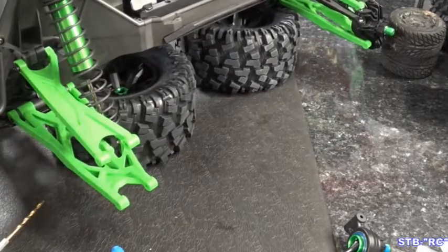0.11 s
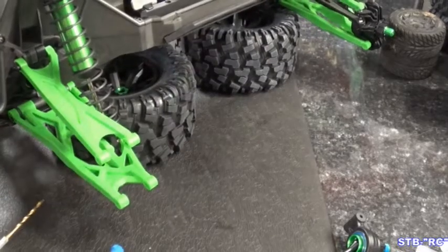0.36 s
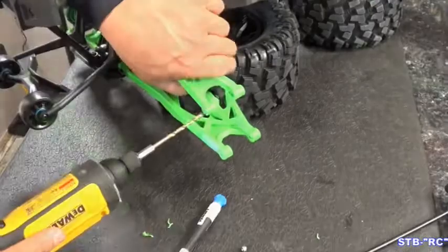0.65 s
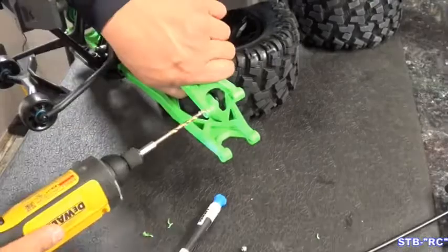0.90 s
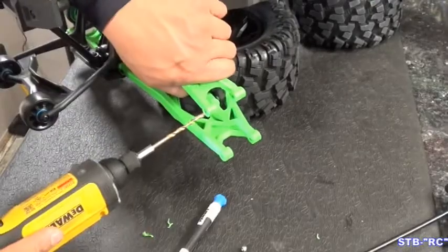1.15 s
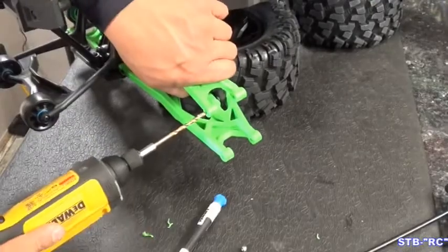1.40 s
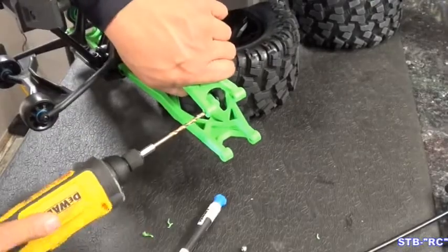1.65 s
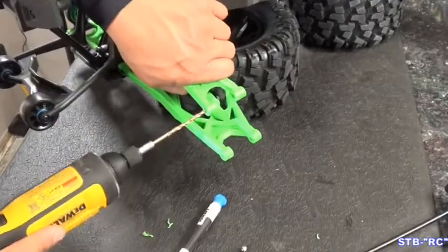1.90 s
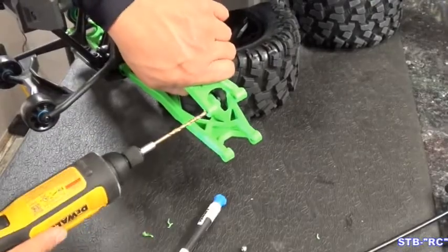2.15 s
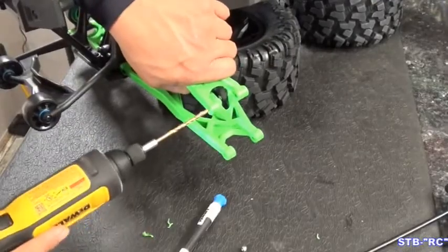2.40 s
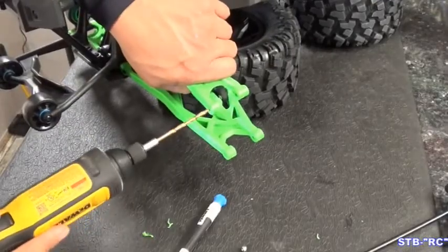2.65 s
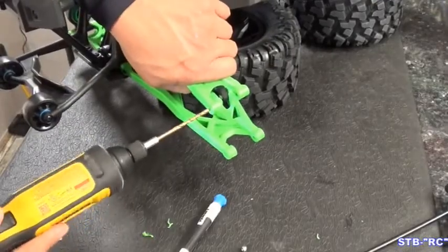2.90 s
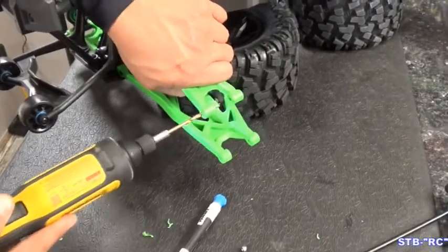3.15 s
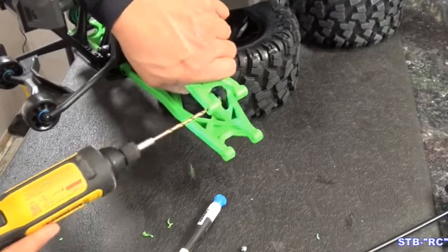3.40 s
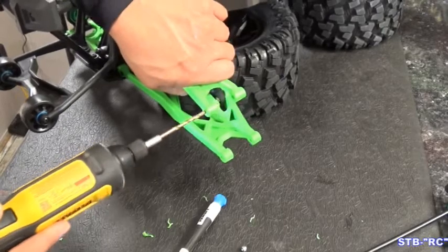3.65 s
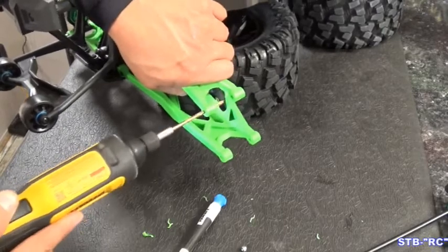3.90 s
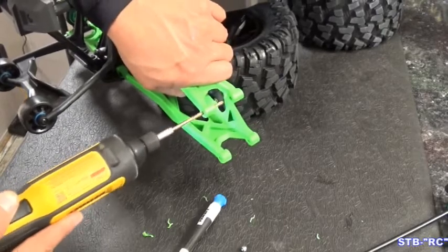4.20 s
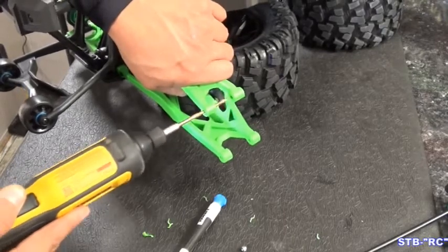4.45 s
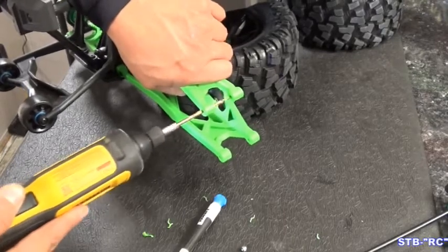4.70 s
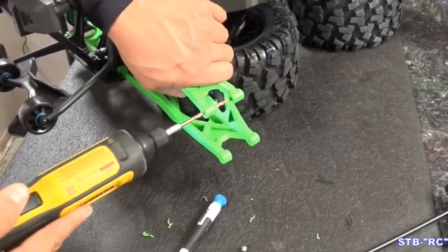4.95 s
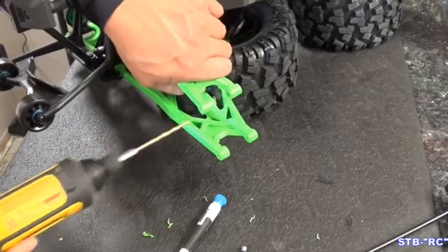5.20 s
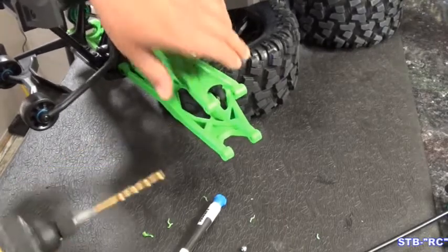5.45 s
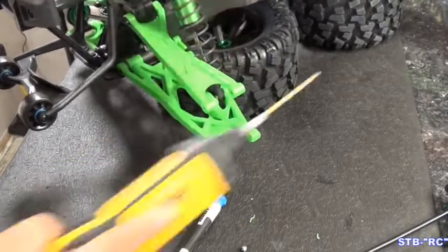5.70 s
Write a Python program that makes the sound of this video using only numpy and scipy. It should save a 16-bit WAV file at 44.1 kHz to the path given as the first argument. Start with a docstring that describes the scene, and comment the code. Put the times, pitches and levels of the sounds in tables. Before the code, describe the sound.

After a bench knock and a few faint plastic ticks, a small cordless screwdriver whirs steadily, its bit scraping briefly through plastic, then brakes to a stop.

```python
"""Small cordless screwdriver in a workshop

A knock on the bench and a few plastic ticks come first, over a rustle that dies away.
Then the motor runs up as tones that follow its speed, and gear tooth contacts ring the housing.
Bright noise grains are the bit scraping through plastic; at the end the motor brakes.
A quiet workshop echoes softly, with room tone behind; one nearly mono microphone hears it all.
"""
import sys
import numpy as np
from scipy import signal
from scipy.fft import rfft, irfft
from scipy.io import wavfile

SR = 44100
rng = np.random.default_rng(int(sys.argv[2]) if len(sys.argv) > 2 else 0)


def inscribe(sig):
    """Save sig as 16-bit PCM at rate SR to the path in sys.argv[1].

    A 1-D sig is mono; a 2-D sig holds one channel per row.
    Samples are clipped to [-1, 1] before scaling.
    """
    pcm = np.round(np.clip(np.atleast_2d(sig).T, -1, 1) * 32767)
    wavfile.write(sys.argv[1], SR, pcm.astype(np.int16))


def ratio(d):
    """dB to gain"""
    e = np.asarray(d, float) / 20
    return 10 ** e


N = 256896   # length in samples

# All source levels hold ahead of the microphone gain; spectrum levels are relative, per Hz of bandwidth.

# Rotor speed: a run-up, then a braked run-down
FREE_TURNS_PER_S, SPIN_FROM_S, SPIN_UP_S = 399.6, 1.605, 0.155
BRAKE_S, BRAKE_DECAY_S = 5.132, 0.11
MOTOR_ON_S, MOTOR_OFF_S = 1.72, 5.25   # the motor is heard between these moments
# The bit binds and slows the rotor: t/s, speed lost/(turns per s)
SPEED_SAG = [(2.8, 0), (2.9, 5.5), (3.0, 17.5), (3.17, 21.5), (3.22, 9.5), (3.33, 0)]
# Pole-passing whine, which comes and goes: t/s, mean level/dB
POLE_WHINE = [(1.72, -63), (1.76, -52), (1.78, -48), (1.83, -64), (1.88, -48.5), (1.94, -58), (2.07, -51.5),
              (2.79, -49), (2.86, -60), (3.2, -59), (3.225, -47.5), (3.26, -70), (3.35, -51), (3.42, -45.5),
              (3.5, -52), (3.6, -81), (4.1, -57), (4.25, -59), (4.36, -51), (4.75, -59), (5.12, -54),
              (5.25, -72)]
# Higher multiples of the rotor rate: multiple, mean level at free speed/dB
HIGHER_ORDERS = [(2, -75), (5, -57.5), (9, -57.5)]
# Rotor imbalance: level at free speed as the motor comes on; grows as speed to this power
IMBALANCE_DB, IMBALANCE_POWER, IMBALANCE_WAVER_DB = -61, 3, 2
IMBALANCE_FADE_DB_PER_S = 1.7   # the bit sinks in and steadies the tool
# The case shaken as the speed sweeps: f/Hz, width/Hz, level before the brake/dB
CASE_SHAKES = [(640, 98, -64), (845, 110, -53), (940, 51, -59)]

# Gear rattle over time: t/s, housing level/dB, treble against housing/dB
GEAR_LEVELS = [(1.69, -60.5, 0), (1.77, -40.5, -10), (1.85, -41, -1.5), (1.94, -41.5, 0.5),
               (2.39, -39.5, -2), (2.86, -39.5, 0.5), (3.03, -39, -1.5), (3.12, -39, -6), (3.3, -39.5, 0),
               (3.54, -39.5, -1.5), (5.1, -39.5, -2), (5.15, -38, 0), (5.19, -41.5, -0.5),
               (5.22, -48, -3.5), (5.34, -60.5, -7), (5.37, -61, -11), (5.45, -76, -3)]
# Colour of the gear housing: f/Hz, level/dB
HOUSING_COLOUR = [(90, -75), (200, -33), (650, -26), (1100, -13), (1500, -11.5), (2000, -7), (2400, -7),
                  (2700, -2.5), (3650, -1), (4200, -4.5), (5200, -9), (6300, -8), (7200, -1.5), (8300, -9),
                  (9800, -23), (11500, -21.5), (12600, -29.5), (14000, -29), (16000, -36)]
# Resonances of the housing, against each other: f/Hz, width/Hz, mean level/dB
HOUSING_MODES = [(2000, 10, -14), (2680, 16, -15), (3040, 100, -13), (3150, 95, 9), (3370, 40, 10.5),
                 (3600, 29, 5.5), (3680, 95, 2.5), (3970, 25, 3), (4220, 15, -14), (5800, 98, -23),
                 (7100, 18, -8)]
# Bright ring of the gear case: f/Hz, width/Hz
CASE_RING = [(6950, 56), (7110, 21), (7240, 12)]
BRIGHT_DB, BRIGHT_WAVER_DB = -16.5, 3.0   # against the housing, outside the swell
# The bright ring sings out once the bit is through
BRIGHT_SWELL_S, BRIGHT_SWELL_DB, BRIGHT_RISE_S, BRIGHT_FALL_S = 3.31, 17.5, 0.069, 0.082

# The bit bites: t of the peak/s, peak level/dB, hold/s
BIT_BITES = [(2.92, -33, 0.067), (3.075, -32.5, .11)]
BITE_RISE_DB_PER_S, BITE_FALL_DB_PER_S = 220, 420
# Colour of the scraped plastic: f/Hz, level/dB
SHAVING_COLOUR = [(350, -42), (600, -25), (1050, -11.5), (1130, -12), (1260, -20.5), (3390, -3),
                  (5120, -4.5), (7410, -5), (13900, -30), (16000, -33)]

# Knocks on the bench: t/s, level/dB, top of the contact's band (lower is softer) f/Hz
BENCH_KNOCKS = [(.303, -23, 3040), (.3089, -24.5, 1490)]
# Modes of the bench top, against each other: f/Hz, level/dB, time to fall 60 dB t/s
BENCH_MODES = [(260, -23, 0.1), (344, -4.5, 0.098), (494, -7, 0.12), (686, -7, 0.2), (851, 5, 0.1),
               (837, -6, .08), (1420, -16, 0.044), (1690, -9, 0.033), (2120, -12, 0.032), (3100, -15, .03)]
# Colour of the noisy tail of a knock: f/Hz, level/dB
KNOCK_TAIL_COLOUR = [(100, -27), (200, -2), (350, -3.5), (510, -0.5), (800, -4), (1100, -16), (1600, -17.5),
                     (2200, -29), (3500, -37), (5000, -60)]
KNOCK_TAIL_T60_S = 0.32
# Jolts of the bench frame: t/s, level/dB
FRAME_JOLTS = [(0.302, -49.5), (3.226, -47.5)]
BOOM_HZ, BOOM_T60_S = 81.7, 0.78

# Plastic ticks and bumps: t/s, tail level/dB, centre f/Hz, width/octaves, time to fall 60 dB t/s
PLASTIC_TICKS = [(0.689, -58, 3000, 2.2, 0.073), (.735, -64, 6000, 0.47, .2), (0.8125, -45, 2370, 1, 0.16),
                 (.812, -52.5, 6500, .66, .04), (0.981, -57, 2000, 0.64, .12),
                 (1.426, -55, 5400, 0.59, 0.16), (1.47, -54, 4000, 1.5, 0.12),
                 (1.601, -50.5, 4730, 0.94, 0.1), (1.655, -45.5, 4200, 1.4, 0.11),
                 (1.658, -41.5, 790, 1.9, 0.1), (1.719, -51, 3460, 2.1, 0.1),
                 (3.191, -41.5, 447, 1.4, 0.098), (3.25, -47, 547, 1, 0.22), (3.192, -36, 1300, .45, 0.054),
                 (3.225, -46, 61.7, 0.85, 0.24), (3.8422, -29.5, 4060, 1.25, 0.1),
                 (5.15, -31.5, 3100, 0.45, 0.034), (5.181, -33, 3100, .7, 0.043),
                 (5.1967, -35, 3180, 0.81, 0.034), (5.2964, -47.5, 5000, 0.71, 0.07),
                 (5.357, -51.5, 2000, 1.7, 0.17), (5.38, -52.5, 4480, 1.1, 0.092),
                 (5.36, -52.5, 1090, 1, 0.37), (5.44, -53.5, 494, 0.49, 0.091),
                 (5.5, -53, 398, 0.89, 0.076), (5.607, -50, 400, 1.4, 0.045)]

# Colour of the rustle at the start: f/Hz, level/dB
RUSTLE_SPECTRUM = [(59, -45), (100, -16), (491, -5), (933, -24), (1030, -21), (1200, -21), (1630, -11.5),
                   (2370, -18), (6790, -13.5), (14000, -41)]
RUSTLE_START_DB, RUSTLE_T60_S = -39, 0.42

# Echo of the workshop
SHOP_T60_S, WALL_CUT_HZ, SHOP_DB = 0.4, 4000, -16.5

# Colour of the room tone: f/Hz, level/dB
ROOM_TONE_COLOUR = [(15, -34), (25, -6), (175, -3.5), (212, -5), (242, 0.5), (354, -1.5), (394, -5.5),
                    (476, -2), (863, -4.5), (1070, -5), (1330, -8), (3080, -12.5), (16000, -19)]
ROOM_TONE_DB = -56

# Colour of the microphone's own hiss: f/Hz, level/dB
HISS_COLOUR = [(25, -2), (300, -2), (800, -10.5), (2000, -15.5), (4000, -9), (7000, -9), (11000, -8),
               (16000, -6.5)]
HISS_DB, MIC_GAIN_DB = -64.5, 3.0
# The level dips briefly: t/s, depth/dB, half width/s
LEVEL_DIPS = [(.1, 1.5, 0.14), (.53, 3, 0.094)]


def seconds():
    """Time of every sample."""
    return np.arange(N) / SR


def rms_one(x):
    """Scale to an rms (average strength) of 1."""
    return x / np.sqrt(np.mean(x ** 2) + 1e-20)


def in_time(rows):
    """Columns of a table over time, joined by straight lines, at every sample."""
    s, *columns = np.transpose(rows)
    return [np.interp(seconds(), s, column) for column in columns]


def while_on(start_s, end_s):
    """1 between two moments, with 10 ms fades."""
    from_start = seconds() - start_s + 0.01
    to_end = end_s - seconds()
    return np.clip(np.minimum(from_start, to_end) / 0.01, 0, 1)


def coloured(x, spectrum):
    """Give a steady excitation a spectrum; rms 1."""
    hz, db = np.transpose(spectrum)
    bins_hz = np.maximum(np.arange(N // 2 + 1) * SR / N, 1)
    filter_db = np.interp(np.log(bins_hz), np.log(hz), db)
    return rms_one(irfft(rfft(x) * ratio(filter_db), N))


def drift(rate_hz):
    """Slow chance wander of spread 1, made at every 40th sample and joined up."""
    r = np.exp(-80 * np.pi * rate_hz / SR)
    noise = rng.standard_normal(N // 40 + 2002)
    slow = signal.lfilter([1], [1, -2 * r, r * r], noise)[2000:]   # skip the filter's start
    return np.interp(np.arange(N) / 40, np.arange(len(slow)), rms_one(slow - slow.mean()))


def ring(clicks, hz, t60):
    """A unit click sets a sine of height 1 ringing; it falls 60 dB in t60 seconds."""
    r, w = ratio(-60 / (t60 * SR)), 2 * np.pi * hz / SR
    return signal.lfilter([0, np.sin(w)], [1, -2 * r * np.cos(w), r * r], clicks + 1e-18)


def t60_of(width_hz):
    """A narrow resonance rings long, a wide one dies soon."""
    return np.log(1000) / (np.pi * width_hz)


def ring_out(level, t60):
    """An envelope that cannot fall faster than a ring dies."""
    fall_db = 60 * seconds() / t60
    level_db = 20 * np.log10(level + 1e-9)
    return ratio(np.maximum.accumulate(level_db + fall_db) - fall_db)


def speed():
    """Rotor turns per second: a smooth run-up, a sag under load, a braked run-down."""
    t = seconds()
    run_up = 1 - np.exp(-(np.maximum(t - SPIN_FROM_S, 0) / SPIN_UP_S) ** 2)
    run_down = np.exp(-np.maximum(t - BRAKE_S, 0) / BRAKE_DECAY_S)
    return (FREE_TURNS_PER_S * run_up - in_time(SPEED_SAG)[0]) * run_down


def motor():
    """Tones at the rotor rate and its multiples; the three poles whine at the third."""
    t, turns, on = seconds(), speed(), while_on(MOTOR_ON_S, MOTOR_OFF_S)
    share = turns / FREE_TURNS_PER_S
    angle = 2 * np.pi * np.cumsum(turns * (1 + 0.001 * drift(15))) / SR
    whine_db = in_time(POLE_WHINE)[0] + drift(10)
    tones = ratio(whine_db) * np.sin(3 * angle)
    imbalance_db = IMBALANCE_DB - IMBALANCE_FADE_DB_PER_S * (t - MOTOR_ON_S)
    imbalance_db += IMBALANCE_WAVER_DB * drift(5.5)
    tones += ratio(imbalance_db) * share ** IMBALANCE_POWER * np.sin(angle)
    for multiple, level_db in HIGHER_ORDERS:
        tone = np.sin(multiple * angle + rng.uniform(0, 2 * np.pi))
        tones += ratio(level_db + 1.65 * drift(24)) * share ** 4 * tone
    out = np.sqrt(2) * tones * on   # a sine of rms 1 is sqrt(2) high
    braking_db = 9.4 * (t > BRAKE_S)   # the brake shakes harder than the run-up
    for hz, width, level_db in CASE_SHAKES:   # the case shudders while the pole rate sweeps through a mode
        shake = rms_one(ring(rng.standard_normal(N), hz, t60_of(width)))
        closeness = np.exp(-((3 * turns - hz) / 110) ** 2)
        out += ratio(level_db) * ring_out(ratio(braking_db) * closeness * on, 0.36) * shake
    return out


def gears():
    """Thousands of uneven tooth contacts a second ring the housing; the level wavers a little by chance."""
    housing_db, treble_db = in_time(GEAR_LEVELS)
    sizes = ratio(0.83 * np.minimum(rng.exponential(1, N), 5)) * rng.standard_normal(N)
    teeth = sizes * (rng.random(N) < 24000 / SR)   # about 24000 contacts a second
    rings = np.zeros(N)
    for hz, width, level_db in HOUSING_MODES:   # each ring swells and fades a little by chance
        rings += ratio(level_db + drift(5)) * rms_one(ring(teeth, hz, t60_of(width)))
    rattle = coloured(teeth, HOUSING_COLOUR) + ratio(-10.5) * rms_one(rings)

    # split at 4900 Hz so that the two parts waver separately
    low = signal.sosfiltfilt(signal.butter(2, 4900, fs=SR, output="sos"), rattle)
    high = rattle - low
    low = rms_one(low * ratio(0.5 * drift(4.9)))
    high = rms_one(high * ratio(0.5 * drift(3.3)))

    since = seconds() - BRIGHT_SWELL_S
    swell_s = np.where(since < 0, BRIGHT_RISE_S, BRIGHT_FALL_S)
    swell_db = BRIGHT_SWELL_DB * np.exp(-(since / swell_s) ** 2)
    bright_db = BRIGHT_DB + BRIGHT_WAVER_DB * drift(4) + swell_db
    bright = rms_one(sum(ring(teeth, hz, t60_of(width)) for hz, width in CASE_RING))

    mix = low + ratio(treble_db) * high + ratio(bright_db) * bright
    on = while_on(GEAR_LEVELS[0][0], GEAR_LEVELS[-1][0])
    return ratio(housing_db + 0.37 * drift(16)) * mix * on


def cutting():
    """The edge tears chips off the plastic: dense bright grains; each bite swells, holds and drops."""
    t = seconds()
    grains = rng.standard_normal(N) * ratio(1.3 * np.minimum(rng.exponential(1, N), 5))
    grains *= ratio(1.4 * drift(40))
    level = np.zeros(N)
    for s, peak_db, hold_s in BIT_BITES:
        rise_db = BITE_RISE_DB_PER_S * np.maximum(s - t, 0)
        fall_db = BITE_FALL_DB_PER_S * np.maximum(t - s - hold_s, 0)
        level += ratio(peak_db - rise_db - fall_db)
    return level * coloured(grains, SHAVING_COLOUR)


def bench():
    """Each knock is a short rough contact into the modes of the bench top; a noisy tail dies away."""
    out, t = np.zeros(N), np.arange(SR) / SR
    noise = rng.standard_normal((len(BENCH_KNOCKS), 2, SR))
    for (s, level_db, soft_hz), (rough, tail_noise) in zip(BENCH_KNOCKS, noise):
        contact = (t < 1 / SR) + 0.053 * rough * ratio(-60 * t / 0.054)   # a click and fading roughness
        band = signal.butter(2, [200, soft_hz], "band", fs=SR, output="sos")
        push = signal.sosfilt(band, contact)
        rung = sum(ratio(db - 7) * ring(push, hz, t60) for hz, db, t60 in BENCH_MODES)
        tail = coloured(np.resize(tail_noise, N), KNOCK_TAIL_COLOUR)[:SR]
        tail *= ratio(-6.5 - 60 * t / KNOCK_TAIL_T60_S) * np.minimum(t / 0.0089, 1)
        at = round(s * SR)
        out[at:at + SR] += (ratio(level_db) * (rung + tail))[:N - at]
    return out


def frame():
    """The bench frame booms low after each jolt."""
    out = np.zeros(N)
    for s, level_db in FRAME_JOLTS:
        t = np.maximum(seconds() - s, 0)
        boom = np.sin(2 * np.pi * BOOM_HZ * t) * np.minimum(t / 0.025, 1)
        out += ratio(level_db - 60 * t / BOOM_T60_S) * boom
    return out


def ticks():
    """A crisp snap and a tail of noise that dies fast, coloured around the pitch of the part."""
    out, t = np.zeros(N), np.arange(SR // 4) / SR
    noise = rng.standard_normal((len(PLASTIC_TICKS), len(t)))
    for (s, level_db, hz, octaves, t60), burst in zip(PLASTIC_TICKS, noise):
        edges = hz * 2 ** (np.array([-0.5, 0.5]) * max(octaves, 0.1))
        band = signal.butter(2, np.clip(edges, 30, 15000), "band", fs=SR, output="sos")
        envelope = ratio(-60 * t / t60) + 0.4 * ratio(-60 * t / 0.0034)   # tail and snap
        tick = ratio(level_db) * envelope * rms_one(signal.sosfilt(band, burst))
        at = round(s * SR)
        out[at:at + len(t)] += tick[:N - at]
    return out


def rustle():
    """Broad noise with a flutter, fading out."""
    level_db = RUSTLE_START_DB - 60 * seconds() / RUSTLE_T60_S + 0.95 * drift(60)
    return ratio(level_db) * coloured(rng.standard_normal(N), RUSTLE_SPECTRUM)


def shop(x):
    """The room's echo: ten feedback delays, duller on every round, stepped block by block."""
    out, dull = np.zeros(N), np.exp(-2 * np.pi * WALL_CUT_HZ / SR)
    lags = (np.geomspace(0.011, 0.037, num=10) * SR).astype(int)   # 11 to 37 ms
    for k, lag in enumerate(lags):
        loop, state = x.copy(), [0.0]
        gain = ratio(-60 * lag / SR / SHOP_T60_S)
        for i in range(lag, N, lag):
            back, state = signal.lfilter([gain * (1 - dull)], [1, -dull], loop[i - lag:i], zi=state)
            loop[i:i + lag] += back[:N - i]
        out += (loop - x) * (-1) ** k   # echoes only, with alternating sign
    return out


def room_tone():
    """Steady coloured noise of the quiet workshop, wavering a little."""
    return ratio(ROOM_TONE_DB + 0.6 * drift(12)) * coloured(rng.standard_normal(N), ROOM_TONE_COLOUR)


def scene():
    """All sources lie straight ahead, the same in both channels."""
    near = motor() + gears() + cutting() + bench() + frame() + ticks()
    mix = near + ratio(SHOP_DB) * shop(near) + rustle() + room_tone()
    return np.tile(mix, (2, 1))


def band_limit(x):
    """A steep low-pass at the top of the band."""
    return signal.sosfilt(signal.butter(12, 16500, fs=SR, output="sos"), x)


def record(dry):
    """The capsules add opposite self-noise; the level dips twice early on; the top is cut."""
    hiss = ratio(HISS_DB) * coloured(rng.standard_normal(N), HISS_COLOUR)
    gain_db = np.full(N, MIC_GAIN_DB)
    for s, depth_db, half_s in LEVEL_DIPS:
        gain_db -= depth_db * np.exp(-((seconds() - s) / half_s) ** 2)
    heard = ratio(gain_db) * (dry + hiss * [[1], [-1]])
    top_cut = signal.ellip(14, 0.3, 70, 15740, fs=SR, output="sos")   # steep, at 15740 Hz
    mix = signal.sosfilt(top_cut, heard)
    return band_limit(mix)


dry = scene()
out = record(dry)
inscribe(out)
```